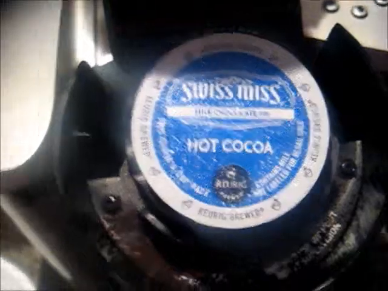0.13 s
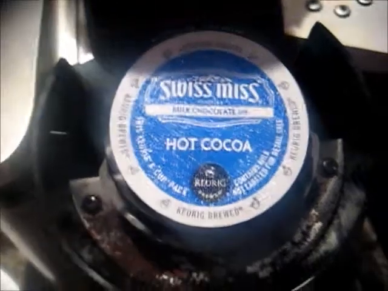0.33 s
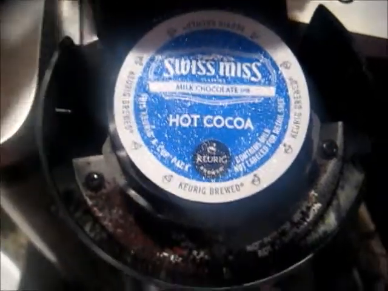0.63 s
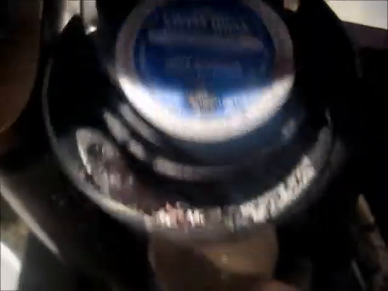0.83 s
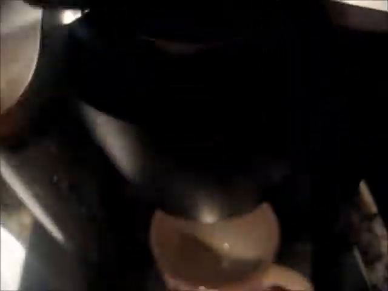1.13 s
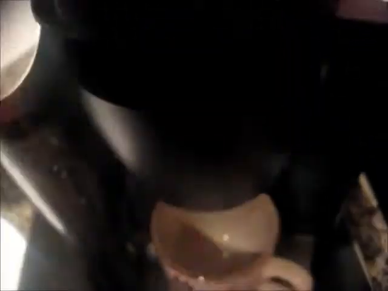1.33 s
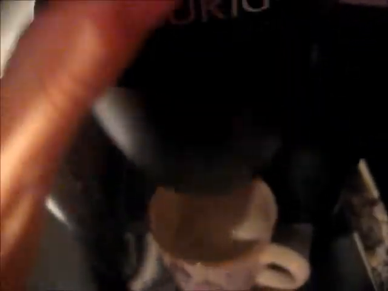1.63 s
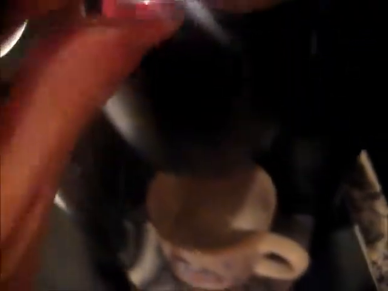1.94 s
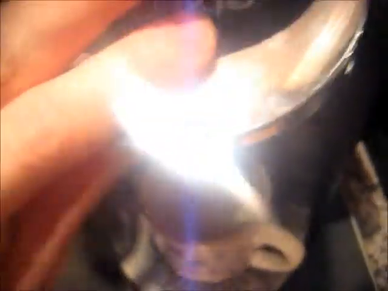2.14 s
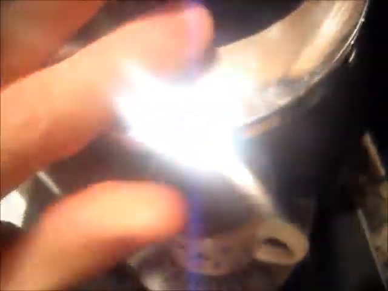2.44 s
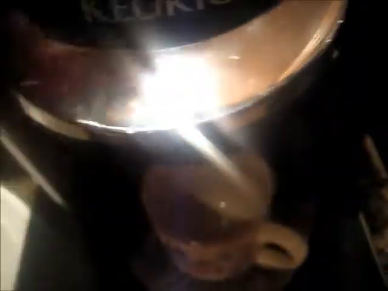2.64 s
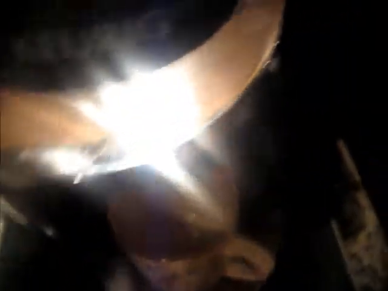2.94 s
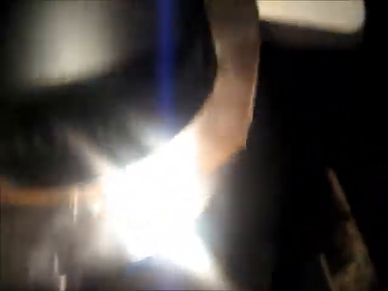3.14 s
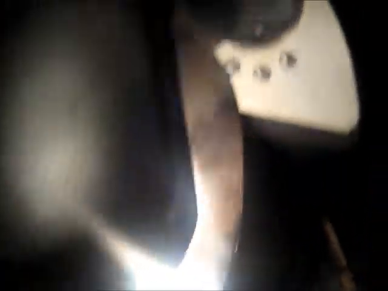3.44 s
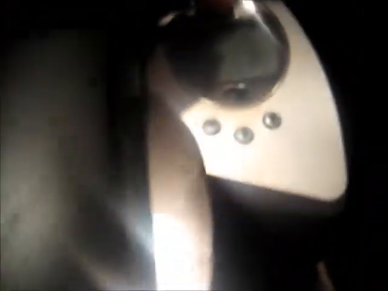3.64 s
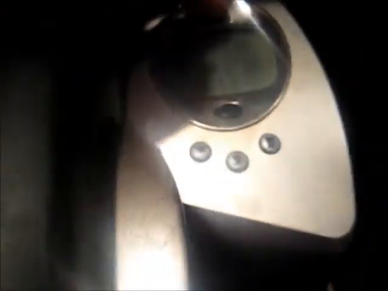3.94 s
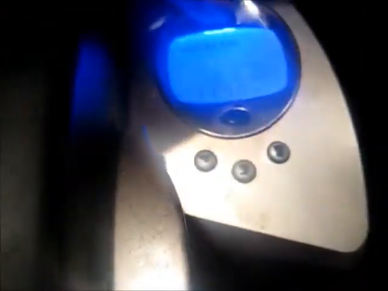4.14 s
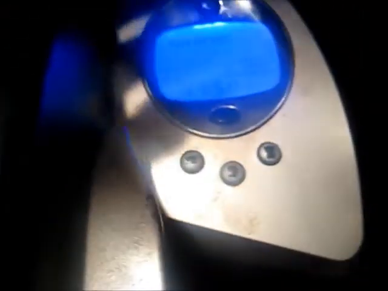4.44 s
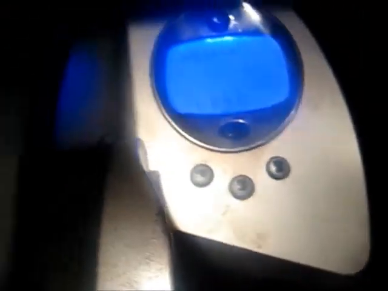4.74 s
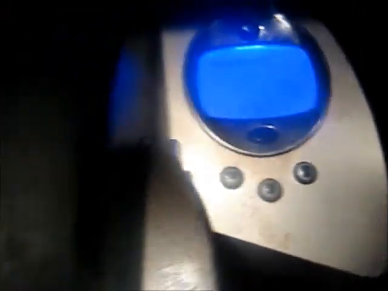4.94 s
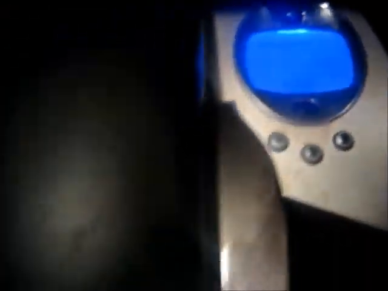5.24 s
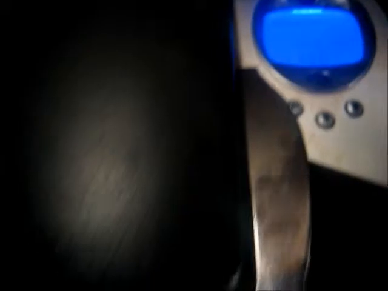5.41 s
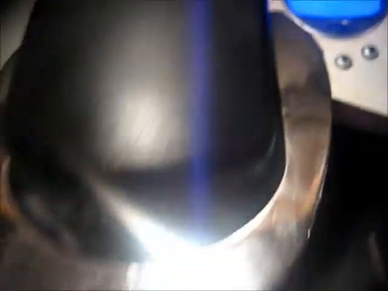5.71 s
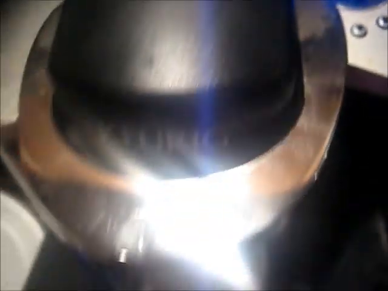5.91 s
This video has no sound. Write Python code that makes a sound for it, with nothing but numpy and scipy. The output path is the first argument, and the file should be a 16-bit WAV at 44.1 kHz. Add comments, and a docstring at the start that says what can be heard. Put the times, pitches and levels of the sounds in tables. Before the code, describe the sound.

Close, rough plastic knocks and scrapes, a brief metallic rattle, a latching crack, then handling ticks and one last sharp clack over faint hiss.

```python
"""A pod coffee maker's lid is pushed down and latched in a quiet kitchen, close to a small camera's microphone.
Plastic parts snap, knock and scrape: rough contacts and clumped slips drive the resonances of the housing.
A metal part rattles and rings once, a hand brushes the lid, and the camera's case creaks in the hand.
Behind lie a short room tail, hiss, hum and a thin whine; gain control ducks the sound after loud knocks
and the hardest ones overload."""
import sys
import numpy as np
from scipy import signal
from scipy.fft import rfft, irfft, next_fast_len
from scipy.io import wavfile
from scipy.ndimage import uniform_filter1d

SR = 44100
rng = np.random.default_rng(int(sys.argv[2]) if len(sys.argv) > 2 else 0)


def master(y):
    """Save y as 16-bit WAV."""
    cut = np.clip(np.atleast_2d(y).T, -1, 1)
    pcm = np.round(cut * 32767)  # scale
    wavfile.write(sys.argv[1], SR, pcm.astype(np.int16))


def decibels_to_gain(level_db):
    """Convert a level in decibels to a linear amplitude gain (20 dB per decade)."""
    exponent = np.asarray(level_db, float) / 20
    return 10 ** exponent


N = 267598  # length in samples


def evened(x):
    """Scales to rms 1."""
    return x / np.sqrt(np.mean(x ** 2) + 1e-20)


def peaked(x, db):
    """Scales to a peak level in dB."""
    return decibels_to_gain(db) * x / abs(x).max()


def add(mix, s, sound):
    """Mixes a sound in at s seconds."""
    part = mix[round(s * SR):][:len(sound)]
    part += sound[:len(part)]


def read(points, hz):
    """Value of a spectrum table at hz, interpolated over log frequency."""
    f, value = np.transpose(points)
    return np.interp(np.log(hz + 1), np.log(f + 1), value)


def coloured(x, spectrum):
    """Filters x by a spectrum table of (f/Hz, level/dB)."""
    size = next_fast_len(len(x))
    gain = decibels_to_gain(read(spectrum, np.fft.rfftfreq(size, 1 / SR)))
    return irfft(rfft(x, size) * gain, size)[:len(x)]


def rung(x, modes, sign=-1):
    """Sum of resonances driven by x, the k-th scaled by sign ** k; like signs leave dips between neighbours."""
    out = np.zeros(len(x))
    for k, (hz, width, db) in enumerate(modes):
        r = np.exp(-np.pi * abs(width) / SR)  # pole radius: a wider mode dies faster
        poles = [1, -2 * r * np.cos(2 * np.pi * hz / SR), r * r]
        out += sign ** k * decibels_to_gain(db) * (1 - r) * signal.lfilter([1, 0, -1], poles, x)
    return out


def grains(count, per_s, spread_db):
    """Randomly timed clicks of either sign, a few of them large."""
    draw = rng.random((count, 3))
    struck = draw[:, 0] < per_s / SR
    size = decibels_to_gain(-spread_db * np.log(draw[:, 2] + 0.018))
    return struck * np.sign(draw[:, 1] - .5) * size


def lumps(count, size, spread_db):
    """Uneven pressure: a gain that wanders over roughly size samples."""
    wander = uniform_filter1d(uniform_filter1d(rng.standard_normal(count), size), size)
    return decibels_to_gain(spread_db * evened(wander))


# resonances of the plastic housing: (f/Hz, width/Hz, level/dB)
HOUSING = [(145, 31, -16.5), (210, 31, -10.5), (309, 52, -7), (560, 220, -11), (915, 540, -1.5),
           (1152, 75, 5), (1316, 133, -1.5), (1630, 107, 3), (1713, 220, -0.5), (2140, 91, 2.5),
           (2213, 117, -0.5), (3010, 2000, -7.5), (3534, 110, 0), (4080, 680, -15), (5120, 166, -12),
           (5480, 790, -15), (6810, 1200, -12), (7240, 1360, -14.5), (9800, 1440, -26.5), (10900, 830, -24)]


def near(hz, octaves_db):
    """The housing's modes, weaker by octaves_db times the squared distance from hz in octaves."""
    return [(f, w, db - octaves_db * np.log2(f / hz) ** 2) for f, w, db in HOUSING]


# plastic parts snapping or knocking with a clean blow:
# (t/s, peak level/dB, struck spot f/Hz, contact fade t60/s, treble crack level/dB over the peak)
SNAPS = [(0.0717, -25.5, 620, 0.018, -25), (.105, -0.9, 860, 0.013, -17), (.155, -28, 740, 0.021, -8),
         (.165, -16, 1700, 0.0055, -5.5), (.174, -21, 780, 0.01, -18), (.217, -33, 785, .021, -12),
         (0.3758, 1.7, 1520, 0.023, -19), (.5138, -26, 1130, .017, -16), (.788, -12, 930, .03, -12),
         (0.802, -5, 3190, 0.058, -5.5), (1.2702, -7.5, 1960, 0.022, -17), (1.2952, 0.5, 1910, 0.008, -30),
         (1.3222, -2, 1940, 0.023, -29), (1.3376, 4, 1165, 0.035, -31), (1.3405, 6.5, 1780, 0.02, -8),
         (1.384, -1.5, 2090, 0.054, -12), (1.431, -20.5, 2240, 0.028, 7), (1.442, -11.5, 2140, 0.019, 1),
         (1.4685, -10.1, 2480, 0.0097, -8), (1.474, 1.5, 2300, 0.0083, -8), (1.6598, -1, 1525, 0.089, -1.5),
         (1.794, -37, 2300, .021, 9), (1.803, -14, 1390, 0.034, -28), (1.894, -32, 420, 0.033, -10.1),
         (1.969, -20, 1230, 0.018, -35), (1.9747, 6.5, 1077, 0.017, -18.5),
         (2.0102, 15.5, 1102, 0.021, -13.5), (2.051, -4, 3970, 0.068, -14), (2.057, -15, 2270, .025, -8),
         (2.098, -15.5, 1270, 0.052, 5.5), (2.183, -13, 736, 0.091, -2.5), (2.227, -28.5, 2260, 0.072, 6),
         (2.27, -19.5, 2230, 0.096, -4), (2.4714, -17.5, 1250, 0.056, -21),
         (3.094, -34.5, 1000, 0.034, -25), (3.1464, -29.5, 2000, .039, -10),
         (3.4582, -14.5, 560, 0.022, -25), (3.888, -14.5, 1890, .025, -18), (3.9533, -8, 1900, 0.059, 2),
         (3.9896, 10.5, 1150, 0.053, -13), (4.046, -18, 780, 0.094, -2.5), (4.126, -25.5, 1370, 0.076, 0.5),
         (4.227, -24, 484, 0.063, -0.5), (4.258, -26.5, 1920, .037, -15), (4.835, -17, 1240, .03, -31),
         (4.907, -33, 700, .02, -25), (5.18, -35, 950, .02, -25)]
# parts catching on each other with a softer, crunchy contact:
# (t/s, peak level/dB, struck spot f/Hz, treble crack level/dB over the peak)
SCUFFS = [(.531, -15.5, 945, -8.5), (.565, -26, 810, -3), (.7185, -14, 870, -12), (.7255, -3.5, 2650, -4),
          (0.741, -20.5, 303, -19), (.775, -13, 910, -6), (0.851, -12, 1130, -3), (0.909, -12.5, 990, -11),
          (.97, -10.5, 1100, -5), (1.127, -14.5, 1470, -1.5), (1.148, -18.5, 620, -18),
          (1.159, -10.5, 4470, 1), (1.169, -3.5, 3500, 4), (1.203, -24, 2300, 5), (1.238, -13.5, 1460, -13),
          (1.491, 2.5, 2010, -9.5), (1.537, -13.5, 2030, -11), (1.557, 3, 1650, -13),
          (1.609, -11.5, 1370, -18), (2.065, -10, 1460, -6), (2.094, -12, 225, -16),
          (2.32, -33.5, 212, -21), (2.106, -22.5, 418, 14.5), (2.167, -15, 2170, -4),
          (2.282, -15.5, 1320, -1.5), (2.532, -17, 1150, 2.6), (3.931, -27, 1790, -15)]
SNAP_RISE_S, SCUFF_RISE_S, SCUFF_T60_S = .00035, .003, 0.038


def snaps():
    """A brief rough contact rings the struck spot and the housing around it, with a crack above."""
    out, t = np.zeros(N), np.arange(4000) / SR
    jolt = t / 0.0017 * np.exp(1 - t / 0.0008)  # hard blows also shove the whole machine
    blows = [(s, db, hz, t60, SNAP_RISE_S, crack_db) for s, db, hz, t60, crack_db in SNAPS]
    blows += [(s, db, hz, SCUFF_T60_S, SCUFF_RISE_S, crack_db) for s, db, hz, crack_db in SCUFFS]
    treble_modes = [m for m in HOUSING if m[0] > 4000]
    for s, db, hz, t60, rise, crack_db in blows:
        onset = np.minimum(t / max(rise, 1e-4), 1) ** 2
        contact, air = rng.standard_normal((2, len(t))) * onset
        contact[round(rise * SR)] -= 0.0041 / rise  # a quick contact opens with one clean blow
        # a softer spot smooths the contact force
        smoothing = signal.butter(2, min(3.67 * hz, SR / 3), fs=SR)
        contact = signal.lfilter(*smoothing, contact * decibels_to_gain(-60 * t / t60))
        body = rung(contact, near(hz, 2.1) + [(hz, 0.1 * hz, 9.)])
        crack = rung(air * decibels_to_gain(-60 * t / (0.61 * t60)), treble_modes)
        blow = peaked(body, 0) + peaked(crack, crack_db) + decibels_to_gain(-37 + 1.1 * db) * jolt
        add(out, s - rise, decibels_to_gain(db) * blow)
    return out


# parts sliding over each other, one stroke a row, levels before the layers are weighted:
# (creak f/Hz, creak width/Hz, creak level/dB over the drag, thrum level/dB over the drag, grit centre f/Hz),
# then its curve of (t/s, drag level/dB, grit level/dB)
STROKES = [ ((860, 200, 5.8, 12, 5500), [(.08, -54, -58), (.15, -59, -60), (.2, -65, -62)]),
           ((850, 220, .1, 3.6, 4500), [(.51, -52, -46), (.558, -40, -41), (.605, -55, -54),
           (.652, -48, -56), (.7, -61, -64)]), ((925, 156, -0.5, -7, 4000), [(.735, -24.5, -38),
           (.77, -32.5, -19.5), (.805, -23.5, -18), (.875, -29, -21), (.965, -24, -27.5)]),
           ((320, 113, -4.5, -8, 4500), [ (.975, -31.5, -27.5), (1.02, -33, -33), (1.11, -38.5, -36)]),
           ((617, 72, -6.5, -10, 4500), [(1.12, -24.5, -25), (1.155, -24.5, -29), (1.19, -30.5, -31),
           (1.225, -36, -30.5), (1.26, -31, -41), (1.28, -40, -38)]), ((1304, 300, -1, -5.5, 3200),
           [(1.28, -42, -39), (1.355, -29.5, -38.5), (1.41, -36, -39)]), ((2098, 300, -2.5, -10, 7400),
           [(1.41, -32.5, -34), (1.468, -33.5, -24.5), (1.505, -32, -28), (1.542, -33, -44),
           (1.58, -37, -35), (1.618, -28, -48), (1.655, -38.5, -41)]), ((2330, 300, -15, -5.5, 5000),
           [(1.675, -20, -35), (1.739, -39.5, -35), (1.802, -46.5, -65), (1.93, -51, -63)]),
           ((1137, 196, -0.2, -5, 3500), [(1.985, -27, -47), (2.022, -30, -33), (2.06, -23, -43),
           (2.098, -21.5, -26), (2.172, -23.5, -36), (2.248, -38, -50), (2.285, -32, -43),
           (2.36, -57, -72)]), ((750, 400, -15, 10.5, 5900), [(2.44, -58.5, -57), (2.5, -47.5, -65),
           (2.56, -49, -47), (2.62, -64.5, -60), (2.78, -56, -66)]), ((896, 250, -6.5, -7.5, 3600),
           [(3.89, -24.5, -66), (3.938, -54, -65), (3.985, -34, -31)]), ((1326, 500, -6.5, -17, 4000),
           [(4.001, -21.5, -36), (4.091, -29, -36.5), (4.183, -45.5, -55), (4.229, -45, -49),
           (4.32, -62, -61)]), ]


def strokes():
    """Clumped slips shake the housing and a creaking joint; grit hisses above and the panels thrum below."""
    low, slips, fine = (grains(N, per_s, 3.5) * lumps(N, size=160, spread_db=2.0)
                        for per_s in (900, 1300, 5000))
    thrum = evened(rung(low, [m for m in HOUSING if m[0] < 700]))
    drag = evened(rung(slips, [m for m in HOUSING if 700 < m[0] < 3000]))
    sand_modes = [(f, 0.43 * w, db) for f, w, db in HOUSING if f > 3000]
    sand = evened(rung(fine, sand_modes) + 0.03 * np.gradient(fine))
    out = np.zeros(N)
    for (creak_hz, width_hz, creak_db, thrum_db, grit_hz), curve in STROKES:
        s, *columns = np.transpose(curve)
        at = np.arange(round(s[0] * SR) - 200, round(s[-1] * SR) + 200)
        drag_db, grit_db = (np.interp(at / SR, s, c) for c in columns)
        joint, grit_band = [(creak_hz, width_hz, 0)], [(grit_hz, 1700, 0)]
        creak = evened(rung(rung(slips[at], joint), joint))
        grit = evened(rung(rung(fine[at], grit_band), grit_band))
        shaken = 1.055 * drag[at] + decibels_to_gain(creak_db) * creak + decibels_to_gain(thrum_db) * thrum[at]
        hissing = 0.68 * sand[at] + 0.45 * grit
        layers = decibels_to_gain(drag_db) * shaken + decibels_to_gain(grit_db) * hissing
        add(out, at[0] / SR, layers * signal.windows.tukey(len(at), 800 / len(at)))
    return out


# resonances of the struck metal part: (f/Hz, width/Hz, level/dB)
SPRING = [(578, 4.6, 4), (703, 21, 1), (2270, 7.9, 8), (2310, 6, 6), (2400, 7.5, 4), (2800, 23, -10.5),
          (3070, 20, -7), (3330, 11, -4), (3880, 19, -6), (4090, 32, -5), (4800, 13, -9), (4690, 16, -5),
          (5120, 14, 0.5), (5200, 18, -9), (5830, 36, -11)]
SPRING_S, SPRING_DB, RATTLE_T60_S = 1.662, -32, .33  # start, rms level, fade of the rattle


def spring():
    """The part rattles against its seat ever more weakly; its sharpest modes ring on after."""
    t = np.arange(SR // 2) / SR
    rattle = grains(len(t), 2000, 1.7) * lumps(len(t), size=200, spread_db=-2.5)
    rattle = rattle * decibels_to_gain(-60 * t / RATTLE_T60_S)
    out = np.zeros(N)
    add(out, SPRING_S, decibels_to_gain(SPRING_DB) * evened(rung(rattle, SPRING)))
    return out


# a hand brushing over the lid: (t/s, level/dB)
BRUSH = [(2.78, -49), (2.786, -35.5), (2.792, -28), (2.806, -34.5), (2.922, -29.5), (2.97, -42)]
# its colour: (f/Hz, relative level/dB per Hz)
BRUSH_COLOUR = [(530, -31), (900, -15), (1160, -9.5), (1500, -7.5), (1710, -18), (2310, -5.5), (2890, -12),
                (3380, 3.5), (5440, -0.5), (6900, 0.5), (7770, -6), (10300, -1.5), (15500, -14)]
BRUSH_DULLS_DB = -16  # treble gain reached at the end of the stroke
RUSTLE_S, RUSTLE_LENGTH_S, RUSTLE_DB, RUSTLE_HZ = 5.25, 0.44, -48.5, 6460


def brush():
    """Fine dense friction of skin on a smooth lid, steadily duller; later a faint rustle of filtered noise."""
    s, db = np.transpose(BRUSH)
    t = np.arange(s[0], s[-1], 1 / SR)
    friction = grains(len(t), 17000, 4.3) * lumps(len(t), size=100, spread_db=-0.1)
    rub = coloured(friction, BRUSH_COLOUR)
    treble = coloured(rub, [(2600, -40), (3100, 0)])
    rub = evened(rub - treble + treble * decibels_to_gain(np.linspace(0, BRUSH_DULLS_DB, len(t))))
    out = np.zeros(N)
    add(out, s[0], decibels_to_gain(np.interp(t, s, db)) * rub * signal.windows.tukey(len(t), .03))
    count = round(RUSTLE_LENGTH_S * SR)
    uneven = rng.standard_normal(count) * lumps(count, size=900, spread_db=2.5)
    rustle = evened(rung(uneven, [(RUSTLE_HZ, 3500, 0)]))
    add(out, RUSTLE_S, decibels_to_gain(RUSTLE_DB) * rustle * np.hanning(count))
    return out


# stick-slip ticks of the camera's hollow case, held in the hand:
# (t/s, peak level/dB, edge level/dB over the peak, fizz level/dB over the peak)
TICKS = [(0.239, -8.5, -2, -15), (3.257, -14, -4.5, -11), (3.29, -15, -6, -12), (3.303, -14, -10, -17),
         (3.331, -14.5, -6.5, -14), (3.398, -13.5, -10, -18), (3.44, -16, -6, -11.5),
         (3.464, -11.5, -12, -17), (3.479, -13, -9, -18), (3.492, -14, -11, -14), (3.506, -14, -14, -20),
         (3.533, -11.5, -15, -18), (3.565, -11, -7.5, -15.5), (3.598, -11.5, -9, -15),
         (3.691, -12, -6.5, -9), (3.711, -17, -4, -12), (3.742, -13.5, -6.5, -10.5), (4.872, -15, -2.5, -2),
         (5.161, -14, -3, -6.5), (5.535, -12.5, -2, -3.5)]
# the case's body, middle and treble resonances: (f/Hz, width/Hz, level/dB before the mode signs)
CASE = [(399, 44.6, 5), (620, 100, -0.1), (755, 72, -0.7), (237, 200, -2.5)]
CASE_EDGE = [(1280, 97, 6), (2460, 390, 6), (3500, 110, -1.5)]
CASE_FIZZ = [(4320, 1800, 3), (5800, 1030, 2.5), (6850, 1340, 1)]


def ticks():
    """Each slip builds up chatter for a millisecond or two, then lets go with a push that rings the hollow case."""
    out, t = np.zeros(N), np.arange(3500) / SR
    for s, db, edge_db, fizz_db in TICKS:
        chatter = rng.standard_normal(len(t)) * np.exp(-abs(t - .0022) / 0.00097)
        push = np.exp(-((t - .002) / 0.00018) ** 2)
        edge = rung(0.46 * chatter - np.gradient(push) * 7.1, CASE_EDGE)
        fizz = rung(chatter, CASE_FIZZ)
        # the hand shifts the modes a little each time
        shifts = rng.standard_normal((len(CASE), 2))
        grip = [(hz * (1 + 0.021 * a), width, mode_db + 2.4 * b)
                for (hz, width, mode_db), (a, b) in zip(CASE, shifts)]
        body = rung(-push + 0.13 * chatter, grip, sign=0.83)
        add(out, s, peaked(body, db) + peaked(edge, db + edge_db) + peaked(fizz, db + fizz_db))
    return out


# decay of the kitchen's tail: (f/Hz, t60/s)
KITCHEN = [(300, 0.25), (1200, 0.08), (4000, 0.042), (10000, 0.065)]


def kitchen(x):
    """Room tail: sparse taps of random sign, each band dying at its own speed."""
    taps = np.zeros(SR // 2)
    at = np.arange(200, len(taps) - 20, 20)
    taps[at + rng.integers(0, 20, len(at))] = rng.choice([-1., 1.], len(at))
    hz, t, z = signal.stft(taps, SR, nperseg=256)
    fade = decibels_to_gain(-60 * t / read(KITCHEN, hz)[:, None])
    tail = signal.istft(z * fade, SR, nperseg=256)[1]
    return signal.fftconvolve(x, tail / np.linalg.norm(tail))[:N]


# colour of the room and microphone hiss: (f/Hz, relative level/dB per Hz)
HISS = [(25, -14), (50, -3.5), (85, -15.5), (123, -2), (160, -9), (210, -4), (260, -7), (420, -5.5),
        (1000, -7.5), (3000, -12.5), (7000, -15.5), (8600, -20), (9600, -10), (11000, -12.5),
        (12000, -21.5), (15900, -24)]
HISS_DB = -46  # rms level
# steady hum and whine: (f/Hz, rms level/dB)
WHINE = [(48.4, -64.5), (7558, -57.5), (7590, -74)]


def hiss():
    """Filtered noise for room and microphone hiss, with sines for a low hum and a thin high whine."""
    t = np.arange(N) / SR
    tones = sum(decibels_to_gain(db) * np.sqrt(2) * np.sin(2 * np.pi * (hz * t + rng.random())) for hz, db in WHINE)
    return decibels_to_gain(HISS_DB) * evened(coloured(rng.standard_normal(N), HISS)) + tones


def scene():
    """Machine and hand noises close to the microphone, their room tail and the hiss."""
    machine = snaps() + strokes() + spring() + brush()
    creak = ticks()
    close = machine + creak + decibels_to_gain(-19.5) * kitchen(machine) + decibels_to_gain(-28.5) * kitchen(creak)
    # the microphone dulls the top treble
    close = coloured(close, [(9000, 0), (12000, -7.5), (16000, -14)])
    return (close + hiss())[None]


def band_limit(x):
    """A steep low-pass at the top of the band."""
    return signal.sosfilt(signal.butter(12, 16060, fs=SR, output="sos"), x)


START_S = .0735  # silence before this
DUCK = 0.37  # dB of gain lost for each dB over the threshold
THRESHOLD_DB, HELD_FALL_DB_PER_S = -19, 84.4  # of the held power level


def record(dry):
    """Sound starts late; gain control falls just after loud knocks and recovers; peaks clip."""
    # mean power of the 300 samples just past
    power_db = 10 * np.log10(abs(uniform_filter1d(dry[0] ** 2, size=300, origin=149)) + 1e-12)
    fall = np.arange(N) * HELD_FALL_DB_PER_S / SR
    held_db = np.maximum.accumulate(power_db + fall) - fall  # jumps up at once, falls steadily
    over_db = np.maximum(held_db - THRESHOLD_DB, 0)
    ducked = dry / decibels_to_gain(DUCK * uniform_filter1d(over_db, size=200, origin=99))
    started = ducked * (np.arange(N) > START_S * SR)
    return band_limit(np.clip(started, -1, 1))


dry = scene()
out = record(dry)
master(out)
```